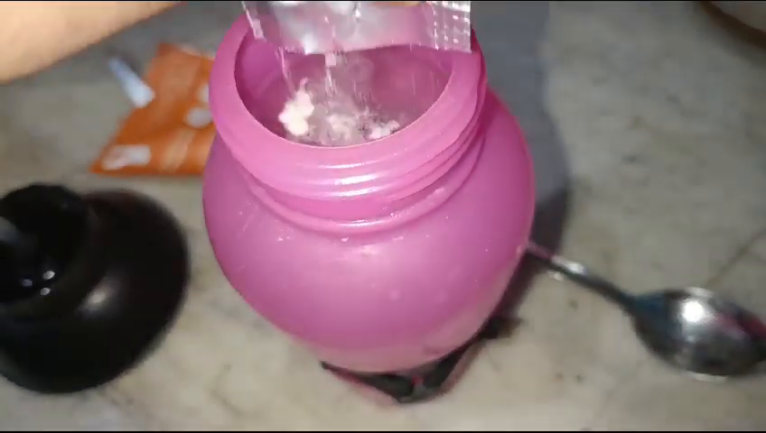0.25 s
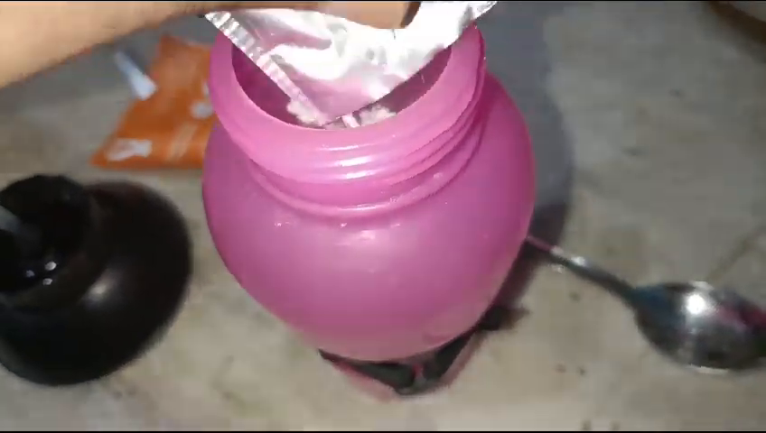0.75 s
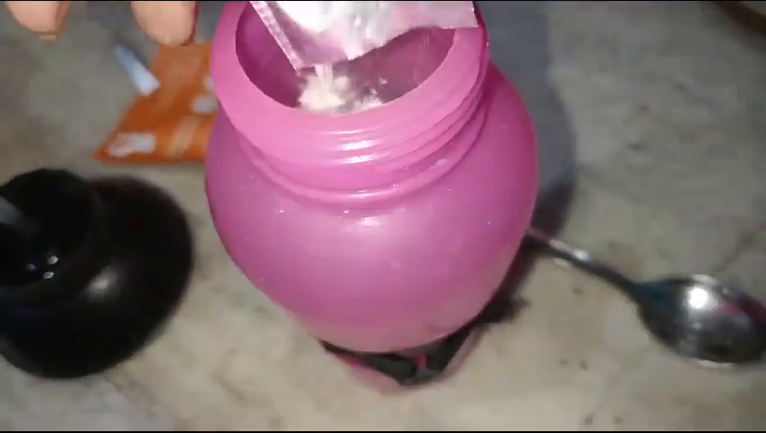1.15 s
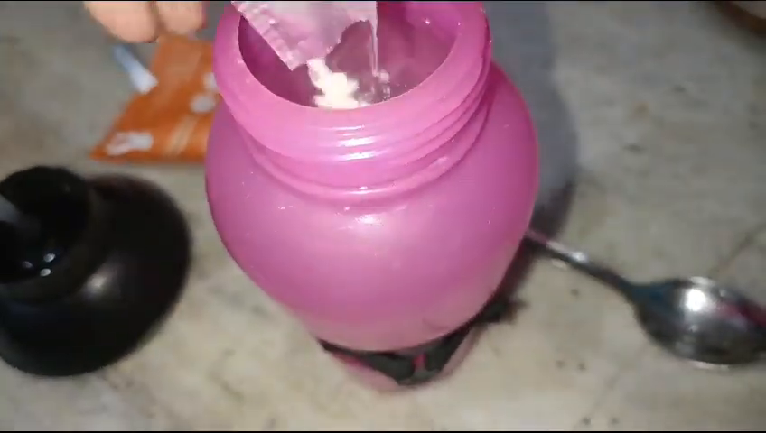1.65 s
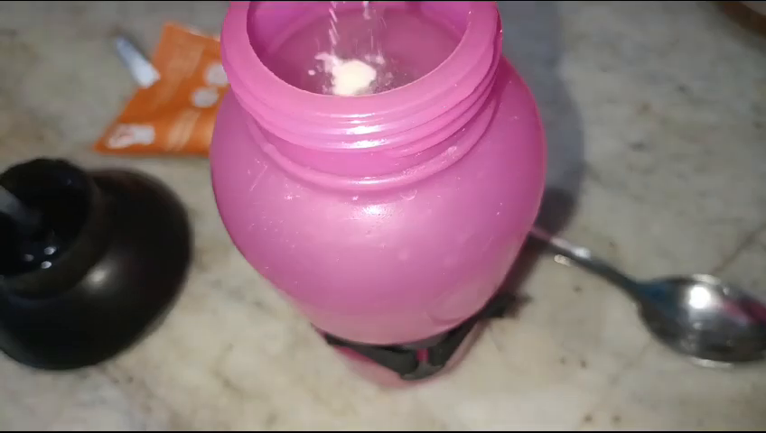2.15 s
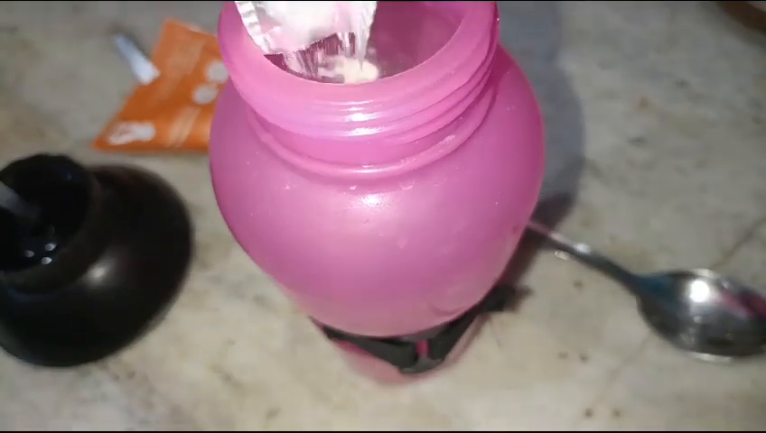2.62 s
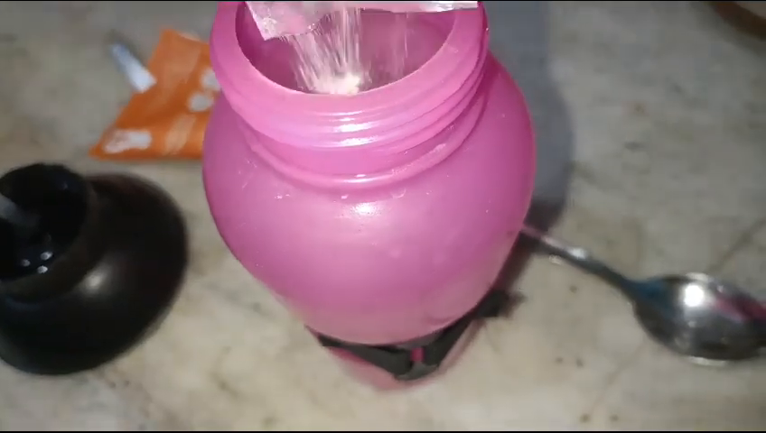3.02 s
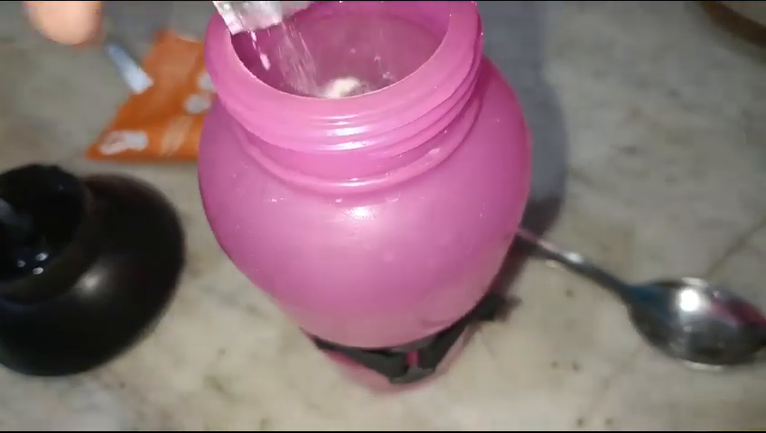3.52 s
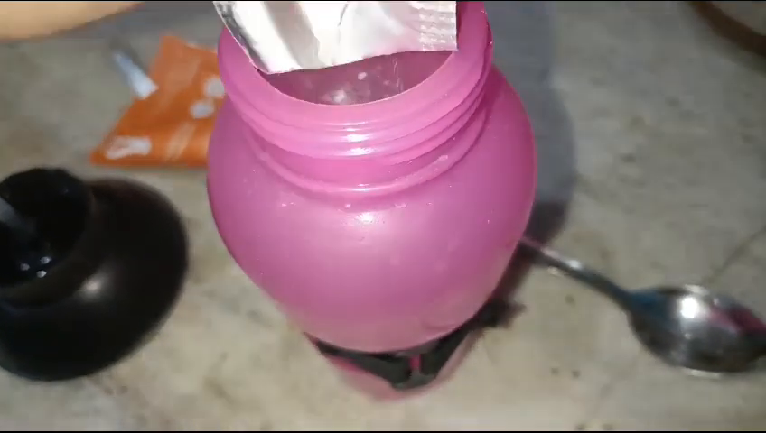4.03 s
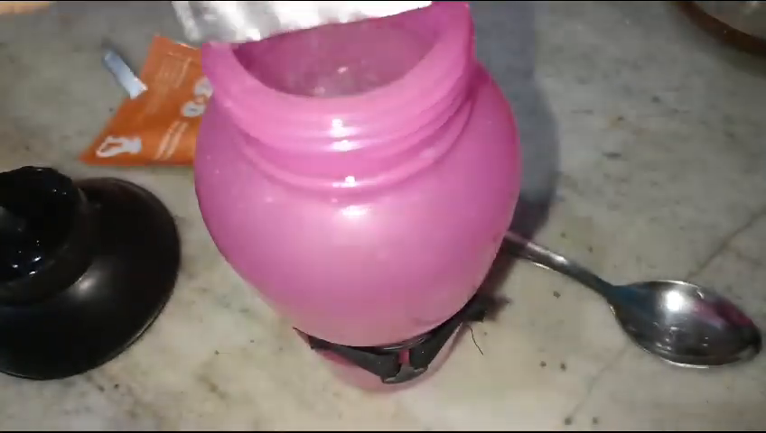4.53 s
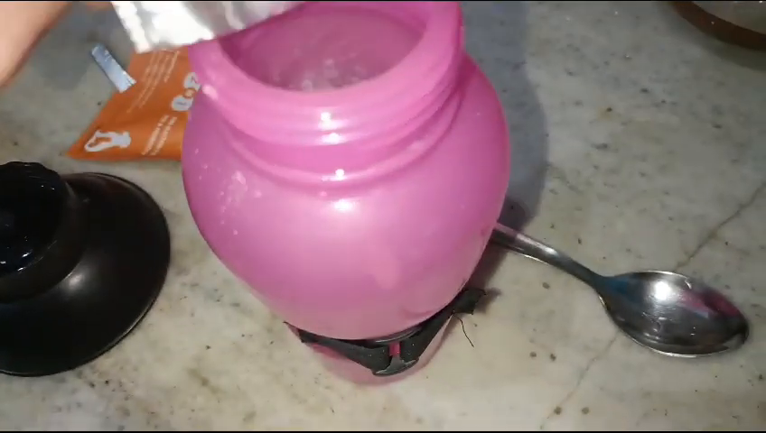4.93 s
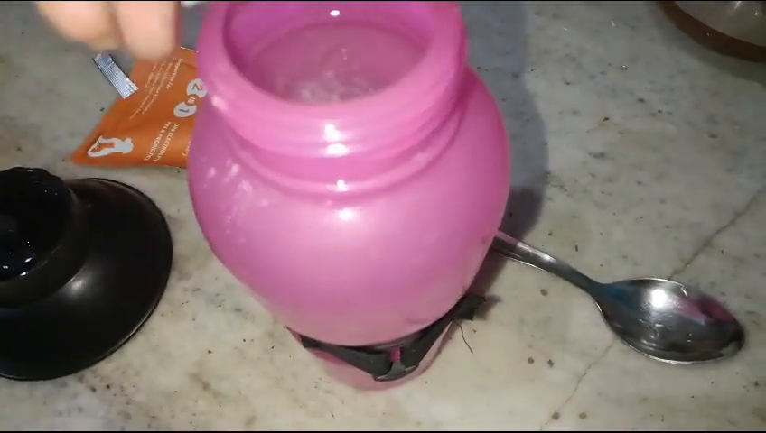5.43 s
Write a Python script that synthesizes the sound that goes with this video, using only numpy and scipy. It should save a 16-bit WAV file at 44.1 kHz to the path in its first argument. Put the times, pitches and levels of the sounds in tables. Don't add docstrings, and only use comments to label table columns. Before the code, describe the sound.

Close to a phone in a hard-floored room, a small foil sachet crinkles in irregular dry snaps and tiny ticks over soft rustling. It quiets around two seconds, then grows busier with a flurry of taps on the plastic bottle rim near three. Hard slaps follow at about four and five seconds, ending in bright crackles. A faint fan hums far away.

```python
import sys
import numpy as np
from scipy import signal
from scipy.fft import rfft, irfft, next_fast_len
from scipy.io import wavfile
from scipy.ndimage import uniform_filter1d, map_coordinates

SR = 44100
rng = np.random.default_rng(int(sys.argv[2]) if len(sys.argv) > 2 else 0)


def gain_from_db(level_db):
    decades = np.asarray(level_db, float) / 20
    return 10 ** decades


def unload_wav(signal):
    wavfile.write(
        sys.argv[1],
        SR,
        np.round(np.clip(np.atleast_2d(signal).T, -1, 1) * 32767).astype(np.int16),
    )


N = 250047

# [t/s, spread/s, crisp level/dB, dull level/dB]
STROKES = [(.13, 0.055, -73, -52), (0.231, 0.03, -55.5, -50), (.41, 0.017, -66, -59),
           (0.699, 0.019, -53, -42), (.755, .015, -48, -46), (0.902, 0.0089, -49.5, -52),
           (1.30, 0.017, -49, -46), (1.421, 0.08, -57, -49), (1.72, 0.038, -59, -61),
           (1.921, 0.044, -54, -70), (2.20, 0.038, -56.5, -58), (2.65, 0.0079, -56, -50),
           (2.83, 0.02, -60.5, -51), (2.938, 0.014, -45, -38), (3.10, 0.041, -54, -57),
           (3.269, 0.046, -57, -43.5), (3.34, 0.032, -53, -54), (3.49, 0.056, -66, -43),
           (3.62, 0.018, -60, -50), (3.97, 0.028, -58, -48), (4.07, 0.03, -52, -45.5),
           (4.27, 0.096, -59.5, -62), (4.61, 0.041, -64, -64), (4.74, 0.033, -62, -55),
           (4.94, 0.016, -69, -56), (5.12, 0.03, -54.5, -56), (5.271, .04, -65, -68),
           (5.54, 0.021, -40, -66), (5.59, 0.02, -41.5, -48), (5.64, .03, -62, -49)]


def unit(x):
    return x / np.sqrt(np.mean(x ** 2) + 1e-20)


def along(points, hz):
    f, v = np.transpose(points)
    return np.interp(np.log(hz + 1), np.log(f + 1), v)


def wobble(rate):
    coarse = np.arange(0, N + 64, 64)
    knots = rng.standard_normal(int(N * rate / SR) + 4)
    curve = map_coordinates(knots, [coarse * rate / SR])
    return np.interp(np.arange(N), coarse, curve)


def filtered(x, response):
    m = next_fast_len(N + 8192, real=True)
    hz = np.fft.rfftfreq(m, 1 / SR)
    return irfft(rfft(x, m) * response(hz), m)[..., :N]


def fan():
    # [f/Hz, level/dB]
    hum_lines = [(98, -58), (146, -61), (194, -59), (243, -62), (330, -66.5), (380, -65)]
    # [f/Hz, level/dB]
    air_colour = [(25, -37), (60, -7), (100, 1.5), (200, 0.5), (420, -1.5), (520, -8), (750, -8),
                  (1000, -12), (2000, -19.5), (4000, -29), (6000, -32.5), (9500, -42.5), (11500, -45),
                  (16500, -64)]
    # [f/Hz, likeness/0..1]
    air_likeness = [(60, 0.6), (290, 0.77), (640, 0.51), (1400, 0.007)]
    # [f/Hz, left-right/dB]
    side_balance = [(100, -2.5), (300, 0), (700, 1), (1300, -1)]
    now = np.arange(N) / SR
    hum = 0
    for hz, db in hum_lines:
        strength = gain_from_db(db + 2.5 + 3.3 * wobble(12))
        hum = hum + strength * np.sin(2 * np.pi * hz * now + 1.43 * wobble(18))

    def mid_side_gain(hz):
        angle = np.arccos(np.clip(along(air_likeness, hz), -1, 1)) / 2
        return gain_from_db(along(air_colour, hz)) * [np.cos(angle), np.sin(angle)]

    mid, side = filtered(rng.standard_normal((2, N)), mid_side_gain)
    swell_db = 0.8 * wobble(3) + 1.1 * wobble(9)
    air = gain_from_db(swell_db - 52.5) * unit(np.array([mid + side, mid - side]))
    return filtered(air + hum, lambda hz: gain_from_db(np.outer([0.5, -0.5], along(side_balance, hz))))


def room(x):
    # [f/Hz, time/s]
    decay_time = [(500, 0.08), (2200, 0.33), (6000, 0.4), (10000, 0.24), (16000, 0.15)]
    # [f/Hz, level/dB]
    tail_colour = [(1200, 0.5), (2200, 1.5), (3000, -0.5), (4800, -1), (6400, 5), (8000, -4.5), (9200, 4),
                   (12000, -1)]
    # [delay/s, level/dB]
    bounces = [
        (.0062, -27),
        (.0083, -21.5),
        (0.0115, -27),
    ]
    hz, t, z = signal.stft(rng.standard_normal((2, SR // 2)), SR, nperseg=256)
    fall_db = along(tail_colour, hz)[:, None] - 60 * t / along(decay_time, hz)[:, None]
    tail = signal.istft(z * gain_from_db(fall_db), SR, nperseg=256)[1]
    tail *= 1 + 1.82 * gain_from_db(-60 * np.arange(tail.shape[1]) / SR / 0.028)
    tail = gain_from_db(-9.0) * tail / np.linalg.norm(tail[0])
    tail = np.pad(tail, ((0, 0), (round(0.0037 * SR), 0)))
    for delay, db in bounces:
        arrival = delay + rng.normal(0, 0.0008, size=2)
        tail[[0, 1], np.round(arrival * SR).astype(int)] += gain_from_db(db)
    return signal.oaconvolve(x[None], tail, axes=1)[:, :N]


def rustle():
    # [f/Hz, level/dB]
    crisp_colour = [(2000, -14), (3500, 12.5), (6000, -2.5), (8000, 10), (9300, -2), (11500, -12.5),
                    (15000, -19)]
    # [f/Hz, level/dB]
    dull_colour = [(500, -13), (1200, 4), (2300, 11), (3500, -37), (6000, -21.5)]
    rest_db = -68
    s, spread, crisp_db, dull_db = np.transpose(STROKES)[..., None]
    coarse = np.arange(0, N + 64, 64)
    stroke = np.exp(-((coarse / SR - s) / spread) ** 2)
    layers = 0
    for db, spectrum, offset_db in ((crisp_db, crisp_colour, -7), (dull_db, dull_colour, -13)):
        happens = rng.random(N) < 3500 / SR
        ticks = happens * gain_from_db(3 * rng.exponential(size=N)) * rng.standard_normal(N)
        clumped = ticks * gain_from_db(2.5 * wobble(60))
        power = np.sum(gain_from_db(db) ** 2 * stroke, axis=0) + gain_from_db(rest_db) ** 2
        level = np.interp(np.arange(N), coarse, np.sqrt(power))
        coloured = filtered(clumped, lambda hz: gain_from_db(along(spectrum, hz)))
        layers = layers + gain_from_db(offset_db) * level * unit(coloured)
    return np.array([layers, layers])


def creases():
    # [t/s, level/dB, crisp/dB, fizz/dB, left-right/dB]
    dry_snaps = [(0.0726, -16.5, -24, -33, -10), (1.0432, -9.5, -6.5, -14.5, -7.5),
                 (1.1014, -15, -5.5, -10.5, -8), (1.2593, -29.5, -4.5, -12, 1), (1.304, -25, -3, -12, 15),
                 (1.3064, -13.5, -8, -27, -10), (1.3114, -10, -17, -30, -10.5), (1.3232, -20.5, 0, -4, -3),
                 (1.3325, -13.5, 4.5, -7, -10), (1.3697, -11, -13.5, -23, -13.5),
                 (1.5572, -7.5, -4.5, -24.5, -13), (2.5063, -14.5, -7, -9.5, -11),
                 (2.8858, -17.5, -11.5, -38, -7.5), (3.0275, -10.5, -3.5, -11.5, -12.5),
                 (3.0798, -18.5, -4.5, -21, -13.5), (3.4477, -21, -13.5, -22, -21),
                 (3.4716, -22, 1.5, -17, -10), (3.903, -17, -8, -26, -5), (3.92, -13.5, -4.5, -10.5, -2),
                 (4.0207, -23, -18, -21, -12), (4.038, -17, 0.8, -25, -6.5), (4.847, -21.5, -14.5, -51, -5),
                 (5.3293, -26.5, -5.5, -21, 1.5), (5.535, -22.5, -13, -22, 0)]
    # [t/s, level/dB, crisp/dB, fizz/dB, left-right/dB]
    knocks = [(0.0762, -16.5, -21.5, -30, -10), (0.1258, -29, -25, -33, -19),
              (0.131, -19.5, -19.5, -24, -5), (0.6536, -29.5, 7.5, 0, -9), (1.2242, -20.5, -6.5, -16, -7),
              (2.0375, -22, -1.5, -16, -2), (2.0865, -31.5, -1, -13, -6), (3.2308, -22, -6, -41, -6.5),
              (3.257, -20.5, -0.5, -14, -11), (3.3941, -19, -3, -19, -15),
              (3.4033, -13.5, -2.5, -13.5, -14.5), (3.522, -23, 1.5, -11, -7.5),
              (4.5734, -19, -16, -30, -0.5), (5.4939, -16.5, -0.9, -4, -2.5),
              (5.5809, -16.5, -6.5, -4.5, 1.5), (5.5883, -27, 6, -16, -17)]
    # [t/s, level/dB, crisp/dB, fizz/dB, left-right/dB]
    slaps = [
        (2.9286, -19.5, -10, -32, -8),
        (2.9323, -23, -0.5, -27, -3),
        (2.9372, -28, -1.5, -25, 1),
        (2.9491, -25, -5, -26, -6),
        (3.9348, -19, -2.5, -21, -6.5),
        (4.117, -7.5, -6.5, -10, -6),
        (4.6887, -22.5, 3, -10, -5),
        (5.0009, -10.5, -6.5, -16.5, -6.5),
    ]
    # [t/s, level/dB, crisp/dB]
    middling = [(.1378, -29, -12), (.203, -35, -17), (0.5599, -28, -9.5), (0.6948, -35, 2),
                (0.6989, -28, -8.5), (1.128, -29, -7), (1.2505, -29.5, -10), (1.289, -27, -5),
                (2.1624, -46.5, 10.5), (2.2583, -27, -12), (2.9178, -25, -30), (3.0202, -22, -14),
                (3.2853, -29, -5.5), (3.8725, -26.5, -12), (3.9503, -26, 2.5), (4.0835, -34, .4),
                (4.8198, -28, -1), (4.9292, -30, -4), (4.9541, -41, 7), (4.968, -46, 11),
                (5.2835, -43.5, 6.5), (5.421, -41.5, 8.5), (5.44, -44, 12), (5.5295, -46, -1),
                (5.5427, -37, 9), (5.5463, -31.5, 6), (5.5627, -61, 4), (5.569, -40, 6), (5.5982, -35, -3),
                (5.6016, -26, 0.5)]
    # [t/s, level/dB]
    soft_ticks = [(.1007, -30), (.1107, -33), (.1158, -31), (.1685, -26.5), (.1795, -33), (.3822, -30.5),
                  (.4085, -32), (.4136, -32.5), (.5271, -28), (.5371, -32), (.7739, -31.5), (.8398, -35),
                  (1.2836, -34), (1.9809, -37.5), (2.1745, -35), (2.6403, -39), (2.9676, -30),
                  (3.3013, -28), (3.3341, -34), (3.3412, -26.5), (3.346, -25.5), (3.5051, -42),
                  (3.6036, -34.5), (3.9611, -33), (3.998, -30), (4.3445, -35), (4.5138, -36), (4.5864, -35),
                  (4.9346, -26), (5.2101, -33)]
    # [t/s, level/dB]
    tight_ticks = [(.2208, -35), (.285, -43), (.6256, -41), (0.7589, -35.5), (1.4252, -42), (1.5262, -31.5),
                   (1.5458, -31), (1.9126, -38), (1.9596, -40), (2.1956, -38.5), (2.2443, -33),
                   (2.2562, -28), (2.365, -41.5), (2.6524, -41), (3.171, -40), (3.1841, -34), (3.6306, -33),
                   (3.9828, -37), (4.1632, -39), (4.1694, -39), (4.245, -35), (4.2717, -35),
                   (4.5968, -35.5), (4.6375, -37), (4.7342, -42), (4.7583, -34.5), (5.1323, -43),
                   (5.2569, -41), (5.3732, -39.5), (5.6309, -40)]
    tick_thud_db = -15.5

    def struck(blows, thud_db):
        return [(s, db, thud_db - 0.44 * (db + 22.5), *rest) for s, db, *rest in blows]

    def lesser(s, db, thud_db, crisp_db):
        fizz_db = 1.08 * crisp_db - 13
        return s, db, thud_db, crisp_db, fizz_db, -6.5

    chance = rng.standard_normal((len(STROKES), 2, 2))
    strays = []
    for (s, spread, crisp_db, _), pair in zip(STROKES, chance):
        for when, size in pair:
            strays.append((s + spread * when, crisp_db + 5.5 + 3 * size))
    every = [(s, db, -23, *rest) for s, db, *rest in dry_snaps]
    every += struck(knocks, thud_db=-14.5)
    every += struck(slaps, thud_db=-9)
    every += [lesser(s, db, -19.5, crisp_db) for s, db, crisp_db in middling]
    for ticks, crisp_db in ((soft_ticks, -18), (tight_ticks, -3), (strays, 2.5)):
        every += [lesser(s, db, tick_thud_db, crisp_db) for s, db in ticks]
    return every


def snaps(groups):
    size, lead = 512, 128
    t = np.clip(np.arange(size) - lead, 0, None) / SR
    hz = np.fft.rfftfreq(size, 1 / SR)
    out = np.zeros((groups, 3, N + size))
    for k, (s, db, thud_db, crisp_db, fizz_db, pan_db) in enumerate(creases()):
        flip, extra_left, extra_right = rng.standard_normal((3, size))
        life = 0.0012 * gain_from_db(rng.normal(0, 2.5))
        fade = np.exp(-(t / life) ** 2) + 0.05 * gain_from_db(-60 * t / 0.018)
        shape = (1 - np.exp(-t / 0.00012)) * fade
        burst = rfft(shape * np.array([flip + 0.4 * extra_left, flip + 0.4 * extra_right]))
        burst /= np.sqrt(uniform_filter1d(np.abs(burst) ** 2, size=17))
        burst = np.vstack([burst, np.exp(-2j * np.pi * hz * lead / SR)])
        colour = [(250, thud_db + 3.0), (900, thud_db + 14), (1500, thud_db + 17), (2300, 3), (3300, -1),
                  (4500, crisp_db + 6.5), (6500, crisp_db - 3.5), (8000, crisp_db + 5),
                  (9300, fizz_db + 3.0), (11500, fizz_db - 6), (13200, fizz_db - 15.5), (16000, fizz_db - 15.5)]
        colour = [(f, level + 1.8 * rng.standard_normal() * (f > 2300)) for f, level in colour]
        side = gain_from_db([[pan_db / 2 + 5.5], [-pan_db / 2 - 3.5], [0]])
        start = int(np.clip(round(s * SR) - lead, 0, N))
        sound = irfft(burst * gain_from_db(along(colour, hz)), size)
        out[k % groups, :, start:start + size] += gain_from_db(db + 12) * side * sound
    return out[..., :N]


def scene():
    far = fan()
    fine = rustle()
    groups = snaps(groups=3)
    direct = groups[:, :2].sum(0) + fine
    lag = np.round(np.linspace(13, 15.6, N)).astype(int)
    direct[1] = direct[1][np.maximum(np.arange(N) - lag, 0)]
    radiated = groups[:, 2]
    radiated[0] += gain_from_db(2) * fine[0]
    return direct + sum(room(g) for g in radiated) + far


def port(modes, f):
    return 1 + sum(gain_from_db(db) * 1j * f * w / (c * c - f * f + 1j * f * w) for c, w, db in modes)


def ducts(x):
    # [f/Hz, width/Hz, level over the plain path/dB]
    left_ringing = [(2450, 700, 2), (6300, 1800, 5), (9300, 1200, 2), (15200, 1300, 5)]
    # [f/Hz, width/Hz, level over the plain path/dB]
    right_ringing = [(2190, 310, 17), (6400, 800, 11), (9200, 900, 7), (15000, 1300, 14)]
    return filtered(x, lambda f: np.array([port(left_ringing, f), port(right_ringing, f)]))


def thinned(x):
    # [f/Hz, level/dB]
    faintest = [(10300, -135), (11000, -112), (14000, -113), (14500, -116), (15700, -116), (15800, -85),
                (16900, -82), (17000, 0)]
    # [f/Hz, level/dB]
    drowned = [(7000, -90), (10000, -56), (11000, -54), (14000, -58), (14500, -62), (15700, -62),
               (15800, -50)]
    hz, t, z = signal.stft(x, SR, nperseg=512)
    power = np.abs(z) ** 2
    band = uniform_filter1d(power, size=7, axis=1)
    loud = uniform_filter1d(np.sum(power, axis=1, keepdims=True), size=5, axis=2)
    least = gain_from_db(along(faintest, hz))[:, None] ** 2 + loud * gain_from_db(along(drowned, hz))[:, None] ** 2
    return signal.istft(z * (band > least), SR, nperseg=512)[1][:, :N]


def top_cut(x):
    return signal.sosfilt(signal.butter(12, 17170, fs=SR, output="sos"), x)


def record(dry):
    x = ducts(dry)
    x = x / (1 + np.abs(x / 0.92) ** 8) ** (1 / 8)
    mix = thinned(x)
    return top_cut(mix)


dry = scene()
out = record(dry)
unload_wav(out)
```